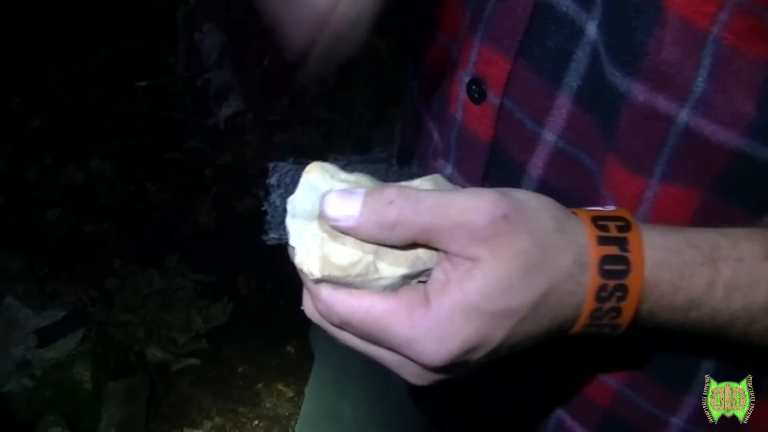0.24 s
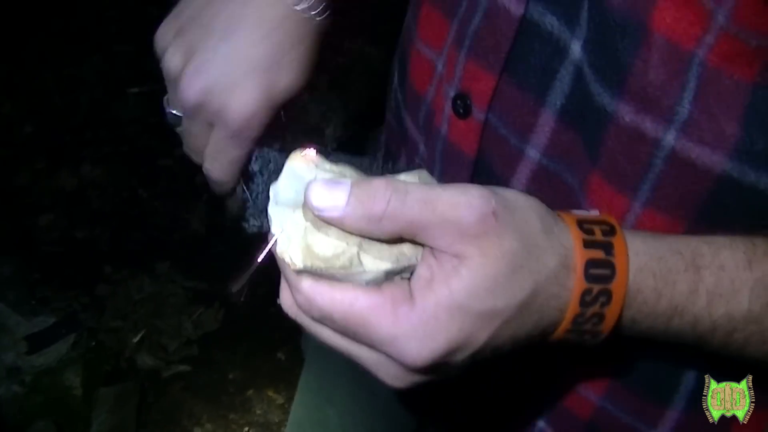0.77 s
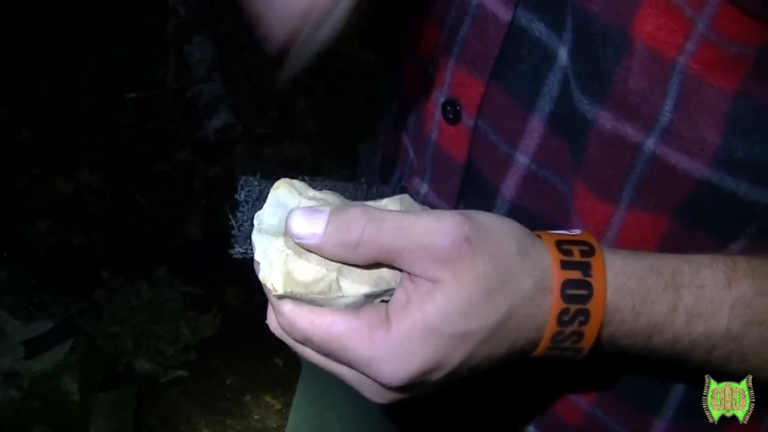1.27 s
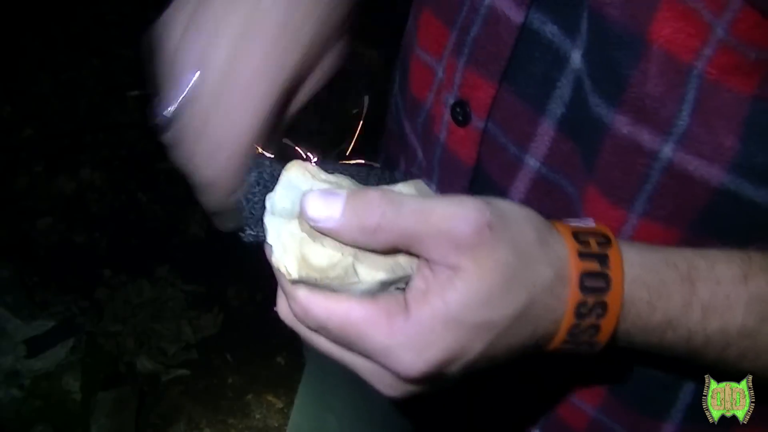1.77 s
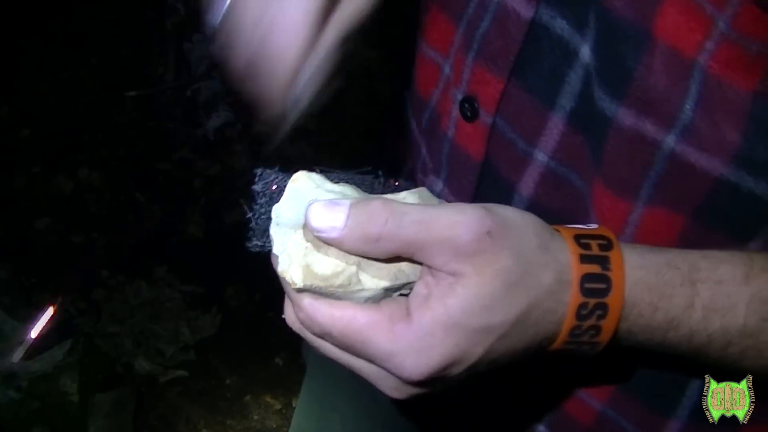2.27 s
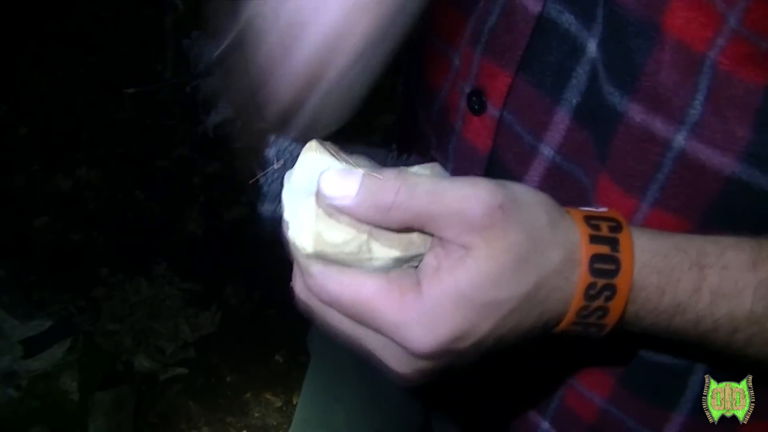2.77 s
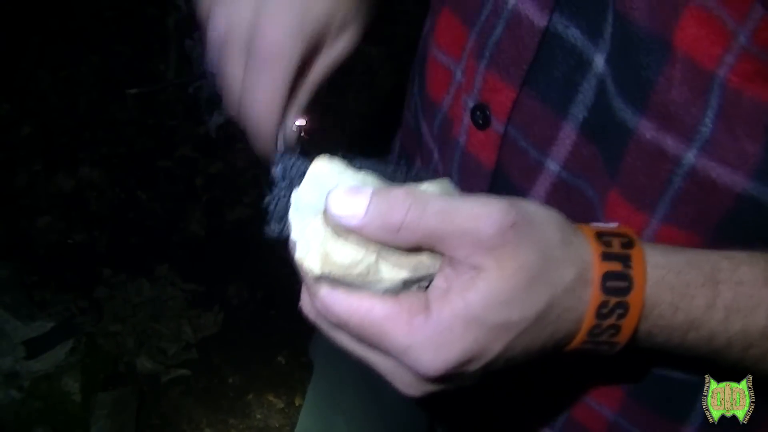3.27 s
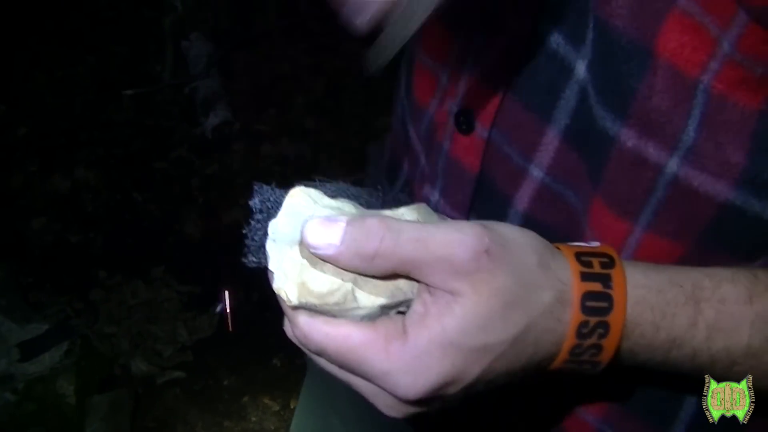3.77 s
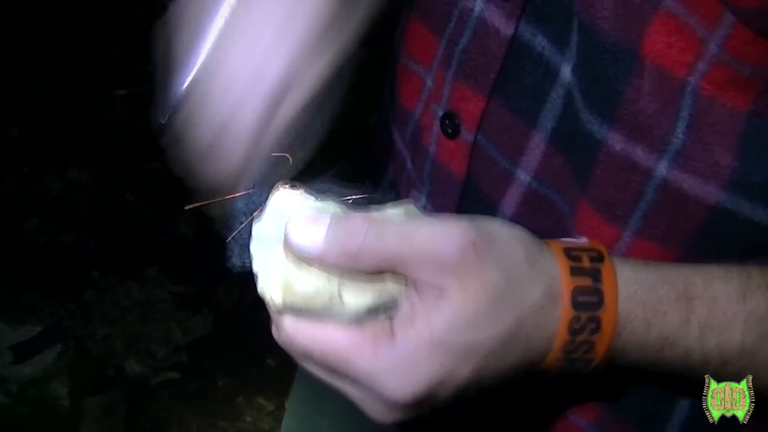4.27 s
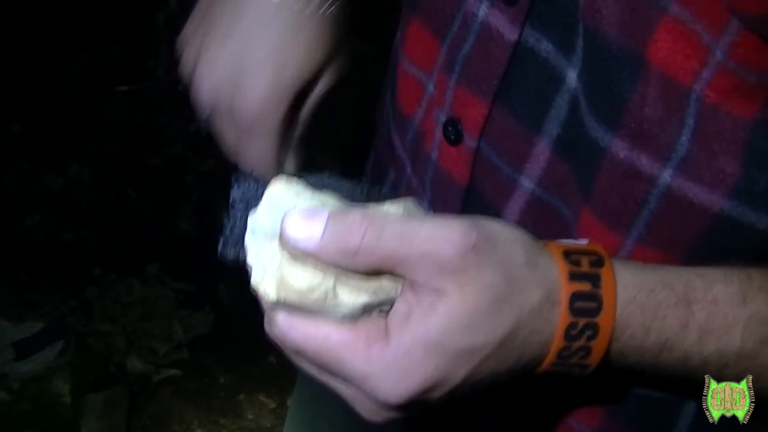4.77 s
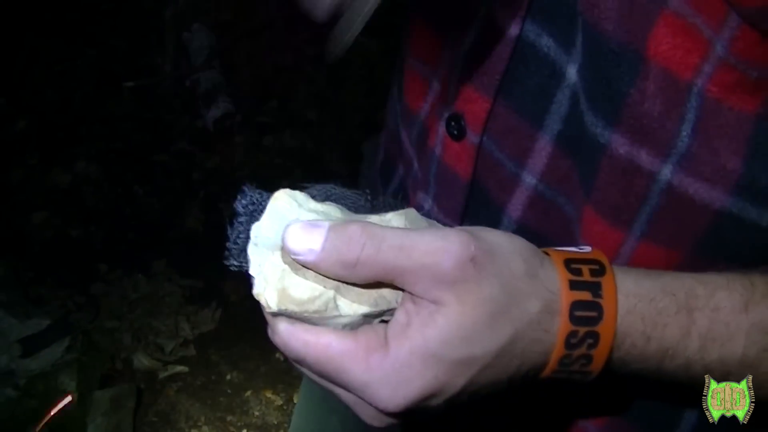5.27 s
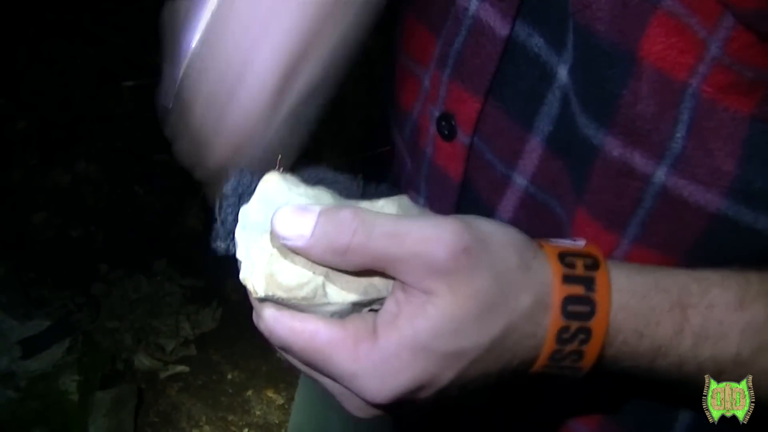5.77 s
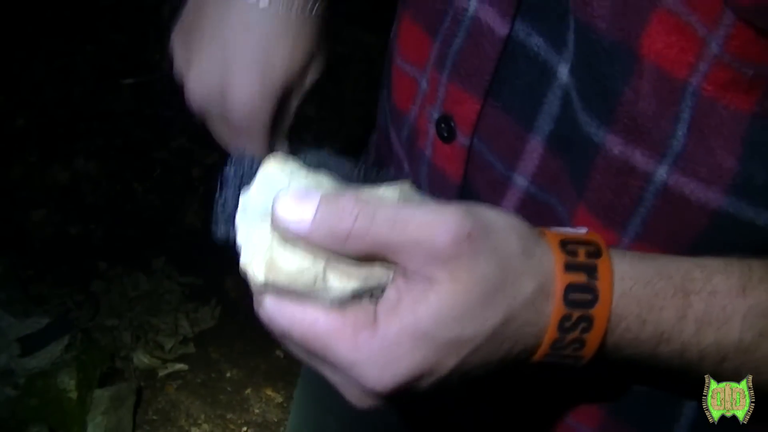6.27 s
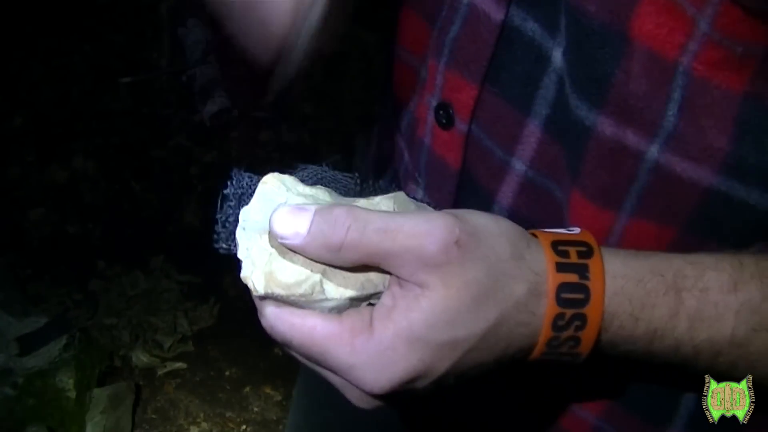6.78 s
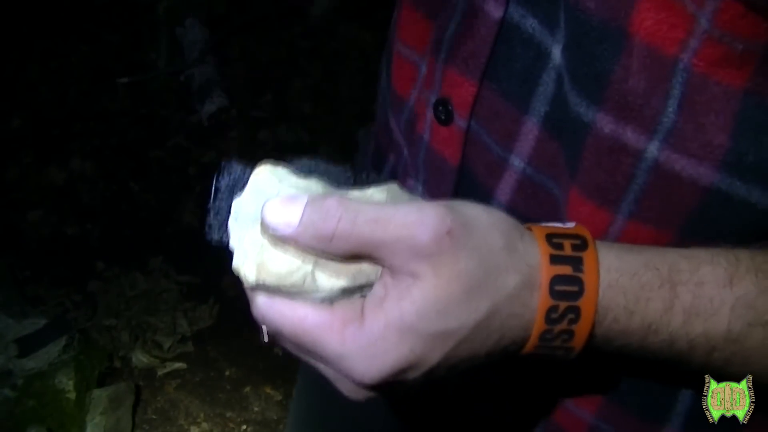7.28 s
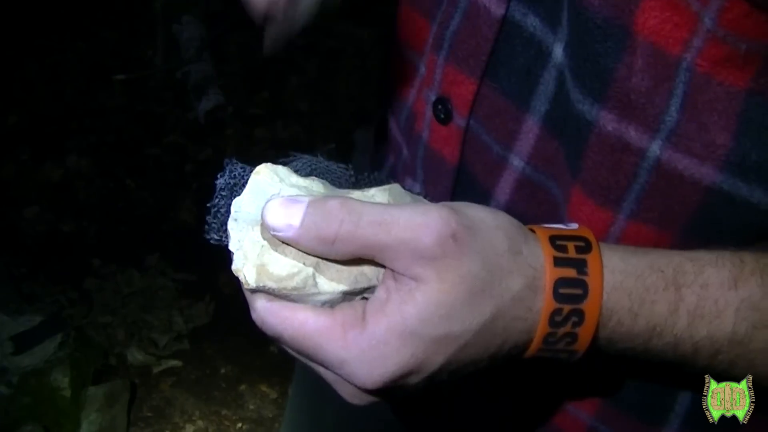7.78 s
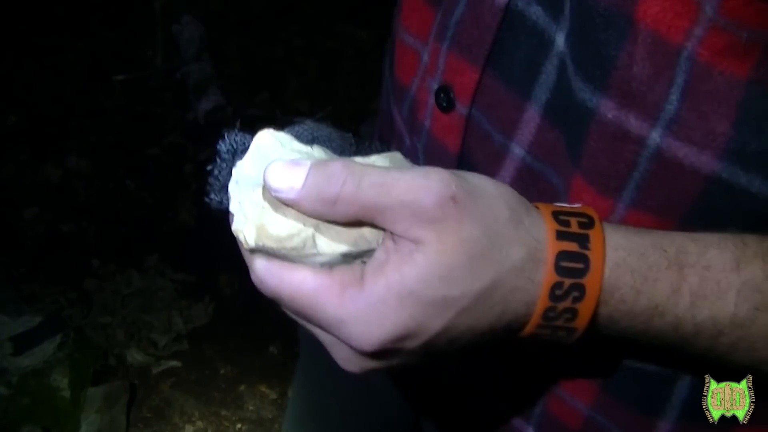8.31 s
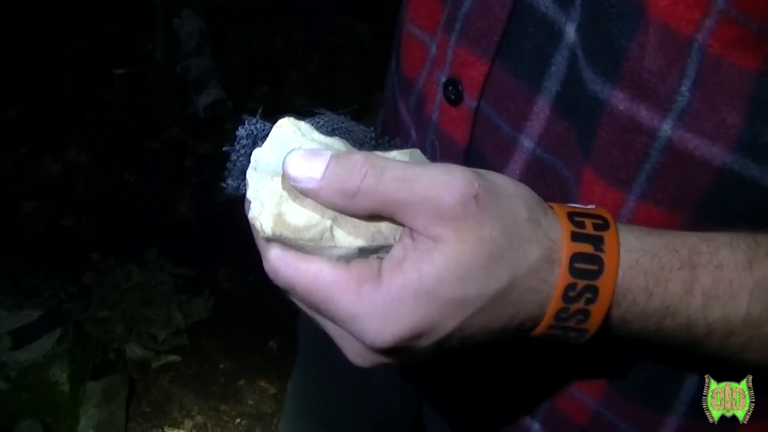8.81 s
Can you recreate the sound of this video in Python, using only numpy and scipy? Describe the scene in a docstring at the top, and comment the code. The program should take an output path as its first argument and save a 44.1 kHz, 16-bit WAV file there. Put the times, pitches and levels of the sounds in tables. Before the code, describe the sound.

Outdoors on a quiet night, bright clicks of steel on flint repeat at a brisk, mostly even pace, spacing out near the end. Stone and steel ring briefly with each strike, close enough to distort the microphone a little. Between the blows, dry leaves rustle and crackle in uneven swells as someone shifts about, and a twig cracks late on. Behind it all is a barely audible low hush of air.

```python
"""Sharp, ringing clicks of a steel striker hitting a hand-held flint again and again, outdoors at night.
In each blow the steel bites the edge, drags for a few milliseconds and catches once more, so stone and
steel ring briefly. Close by, dry leaves rustle and crunch and a twig snaps as someone shifts about.
A faint low hush lies under it all, and the small microphone overloads on the blows."""
import sys
import numpy as np
from scipy import signal
from scipy.fft import rfft, irfft, next_fast_len
from scipy.io import wavfile

SR = 44100
rng = np.random.default_rng(int(sys.argv[2]) if len(sys.argv) > 2 else 0)


def generate_wav(sig):
    """Save sig (samples, or channels by samples) to the path in sys.argv[1] as 16-bit PCM at SR."""
    pcm = np.round(np.clip(np.atleast_2d(sig).T, -1, 1) * 32767).astype(np.int16)
    wavfile.write(sys.argv[1], SR, pcm)


N = 399105

# The blows; the grip and the spot where stone meets steel change each time. Columns: start_s, drag_ms,
# catch_db, deep_flint_db, low_steel_db, middle_steel_db, top_steel_db
BLOW_LIST = [(0.0803, 7.4, -0.5, -1, -7, 0.5, 0.5), (0.4301, 1.84, -1.5, 2.5, -3.5, 0, -21),
             (0.7702, 3.6, 1.5, 3, -7, -12, -2), (1.1227, 0.98, 1.5, -7, -8, 3, -8),
             (1.4643, 1.1, -9, 0.1, -17, 1.5, -3), (1.8046, 2.7, -4, 3.5, -15, -5, -16),
             (2.1547, 1.04, 4, 1, -22, -5, 6), (2.8381, 5.1, 4, 4.5, -6, -5, 0.1),
             (3.2084, 1.0, -7, -0.5, -9, -12, -14), (3.5632, 4.96, 10, 2, -19, -4.5, -8),
             (3.9545, 0.87, -5, -1.5, -18, -3, -4), (4.3257, 2.8, 1, 1, -19, -17, 1),
             (4.7114, 1.1, -6, -8, -23, -19, -21), (5.0786, 2.9, -3, -2.5, -13, -3, -3.5),
             (5.4575, 4.2, 3, 2.5, -15, -7.5, -8), (5.8353, 1.2, -0.5, 1, -8, -6, -17),
             (6.2207, 1.2, -9, -1, -27, -2, -13), (6.6128, 3.5, 1.5, 1.5, -27, -5, -10),
             (6.996, 3.7, 3, 2.5, -10.5, -12, -5), (7.3864, 1.8, -10, 6, -10, -16, -18),
             (8.0436, 3.7, -3, -1, -12, -12, -20), (8.4644, 2.0, -5, -10, -21, 2, -20),
             (8.9547, 6.8, 0, 1.5, -21, -14, -19)]
# The tone of dry leaves, from bass to treble. Columns: pitch_hz, level_db
LEAF_TONE = [(30, -65), (100, -59), (255, -26), (433, -16.5), (547, -13.5), (760, -20), (1000, -8.5),
             (1300, -4.5), (1800, -3), (2420, -2), (3320, -2), (4500, -3), (5600, -5), (9500, -8.5),
             (12900, -17), (16000, -30.5)]


def amp(db):
    """Turn decibels into a number to multiply by."""
    return 10 ** (np.asarray(db) / 20)


def rms_one(x):
    """Scale a sound so that its average strength (rms) is 1."""
    return x / np.sqrt(np.mean(x ** 2) + 1e-20)


def at_hz(points):
    """Join (pitch_hz, value) points into a curve with a value for every frequency."""
    hz = np.maximum(np.fft.rfftfreq(next_fast_len(N), 1 / SR), 1)
    pitches_hz, values = np.transpose(points)
    return np.interp(np.log(hz), np.log(pitches_hz), values)


def colour(x, gain):
    """Change the tone of a sound: multiply each frequency by its own gain."""
    return irfft(rfft(x, next_fast_len(N)) * gain, next_fast_len(N))[:N]


def drift(rate_hz):
    """A smooth random wobble of typical size 1."""
    r = np.exp(-2 * np.pi * rate_hz / SR)
    return rms_one(signal.lfilter([1], [1, -2 * r, r * r], rng.standard_normal(N + SR))[SR:])


def ring(clicks, hz, fade_s):
    """Each click starts a pure tone that dies away; fade_s is the time it takes to drop 60 dB."""
    r = amp(-60 / (max(fade_s, .001) * SR))
    w = 2 * np.pi * hz / SR
    return signal.lfilter([0, np.sin(w)], [1, -2 * r * np.cos(w), r * r], clicks + 1e-18)


def grains(per_s, spread_db):
    """Tiny cracks of uneven size at random moments."""
    sizes = amp(spread_db * np.minimum(rng.exponential(1, N), 5)) * rng.choice([-1, 1], N)
    return rms_one(sizes * (rng.random(N) < per_s / SR))


def night(level_db=-66):
    """A faint, steady, low hush of distant outdoor air."""
    # The tone of the hush. Columns: pitch_hz, level_db
    hush_tone = [(25, -30), (60, -30), (180, -8.5), (500, -3), (900, -1), (2000, -40)]
    return amp(level_db) * rms_one(colour(rng.standard_normal(N), amp(at_hz(hush_tone))))


def rustle(flutter_db=1.29, flicker_db=0.8, usual_db=-32):
    """Dry leaves make many tiny cracks over a hiss; bass, middle and treble each flicker a little."""
    # How loudly the leaves rustle as someone shifts about. Columns: time_s, level_db
    loudness = [(0, -40), (.15, -37), (.36, -42), (.54, -40), (.63, -46.5), (.73, -39), (1.28, -39),
                (1.43, -26.5), (1.59, -25.5), (1.77, -33), (1.85, -26), (1.99, -28.5), (2.07, -24.5),
                (2.375, -32.5), (2.39, -24), (2.52, -30.5), (2.8, -30.5), (2.94, -34), (3.5, -34.5),
                (3.82, -44), (3.91, -33), (4.21, -29.5), (4.235, -20.5), (4.57, -20.5), (4.82, -32),
                (5.3, -31), (5.74, -35), (5.85, -35), (6.025, -43.5), (6.032, -30.5), (6.3, -38),
                (6.51, -27), (6.77, -37), (6.97, -41), (7.04, -35.5), (7.15, -46), (7.24, -45.5),
                (7.255, -33.5), (7.6, -31.5), (7.64, -37), (7.72, -30), (8.02, -26), (8.18, -37.5),
                (8.24, -29.5), (8.28, -24.5), (8.66, -24), (8.78, -26), (8.85, -23), (8.96, -25.5),
                (9.05, -18.5)]
    level_db = np.interp(np.arange(N) / SR, *np.transpose(loudness))
    treble_db = -2.5 + 0.026 * (level_db - usual_db)   # louder is slightly brighter
    bass_db = 5 - 0.18 * (level_db - usual_db)   # the bass swings less than the rest
    hiss_and_cracks = rng.standard_normal(N) + amp(-3) * grains(per_s=3000, spread_db=2.5)
    leaves = rms_one(colour(hiss_and_cracks, amp(at_hz(LEAF_TONE))))
    bass = colour(leaves, at_hz([(600, 1), (1000, 0)]))
    treble = colour(leaves, at_hz([(4500, 0), (9000, 1)]))
    middle = leaves - bass - treble
    mixed = middle * amp(flicker_db * drift(7))
    mixed += bass * amp(bass_db + flicker_db * drift(17))
    mixed += treble * amp(treble_db + flicker_db * drift(20))
    return mixed * amp(level_db + flutter_db * drift(29))


def crunches():
    """A crushed leaf gives a fading burst of cracks, loudest near its own pitch; returns mid and side."""
    # Leaves being crushed. Columns: start_s, level_db, fade_s, pitch_hz
    crushed_leaves = [(0.721, -35.5, .06, 2220), (0.8091, -35, .05, 3130), (0.8988, -25, 0.054, 2300),
                      (0.963, -27.5, 0.02, 4170), (0.978, -19, 0.0085, 5450), (0.9826, -21, 0.032, 5640),
                      (1.4122, -29, 0.059, 4850), (1.5928, -27, 0.21, 5070), (1.9116, -23.5, .046, 3480),
                      (2.0177, -26, .037, 3350), (2.046, -21, 0.015, 4730), (2.382, -30.5, 0.3, 3340),
                      (2.546, -34, 0.056, 4110), (3.1895, -29, .05, 3260), (3.32, -26.5, 0.12, 4670),
                      (4.6894, -25.5, 0.09, 3360), (5.056, -31, .066, 3030), (5.3235, -29.5, 0.15, 3500),
                      (5.559, -29, 0.046, 5030), (6.0292, -27, 0.033, 4700), (6.135, -32, 0.066, 3140),
                      (6.191, -32, 0.12, 3310), (6.419, -30.5, 0.056, 4200), (6.474, -32, 0.36, 3030),
                      (7.247, -34, 0.3, 2270), (7.306, -33, 0.11, 2260), (7.4734, -27, 0.027, 2190),
                      (7.5325, -31.5, 0.061, 4770), (7.5797, -29, .04, 4260), (7.8894, -29, 0.04, 4170),
                      (7.9483, -32, 0.035, 4080), (8.017, -22.5, 0.16, 3600), (8.57, -18, 0.033, 4720),
                      (8.6863, -22, 0.18, 4260), (8.8245, -24.5, 0.039, 4180), (8.8982, -27.5, 0.041, 4330),
                      (9.0008, -25, 0.1, 4540)]
    cracks = rng.standard_normal(N) + amp(4) * grains(per_s=4000, spread_db=2.5)
    mid, side = np.zeros(N), np.zeros(N)
    leans = 2 - rng.standard_normal(len(crushed_leaves))   # scattered, mostly a little to the left
    for (start_s, level_db, fade_s, pitch_hz), lean in zip(crushed_leaves, leans):
        at = round(start_s * SR)
        burst = cracks[at:at + SR // 5]
        near_pitch = signal.lfilter(*signal.iirpeak(pitch_hz, 2.5, fs=SR), burst)
        t = np.arange(len(burst)) / SR
        crunch = (1.58 * burst + 2 * near_pitch) * amp(level_db - 60 * t / fade_s)
        mid[at:at + len(t)] += crunch
        side[at:at + len(t)] += crunch * .5 * np.tanh(lean * np.log(10) / 40)
    tone = amp(at_hz(LEAF_TONE))
    return colour(mid, tone), colour(side, tone)


def snaps():
    """Each snap makes a twig ring briefly; a thin twig gives off no bass."""
    # The moments a twig snaps. Columns: start_s, level_db
    breaks = [(6.0294, -21.5), (6.7973, -8), (6.8082, -23)]
    # The tones the twig rings with. Columns: pitch_hz, level_db, fade_s
    twig_tones = [(600, -10, 0.021), (1830, 2.5, 0.0032), (2420, 5, 0.0034), (4500, -7.5, 0.013)]
    clicks = np.zeros(N)
    for start_s, level_db in breaks:
        clicks[round(start_s * SR)] = -amp(level_db)
    ringing = sum(amp(db) * ring(clicks, hz, fade_s) for hz, db, fade_s in twig_tones)
    return signal.sosfilt(signal.butter(2, 350, "high", fs=SR, output="sos"), ringing)


def close_echoes(x, moving_share=0.091, housing_share=0.091):
    """Two very quick echoes ripple the tone, and the microphone's housing adds a hollow ring."""
    # How late the echo off something close and moving arrives. Columns: time_s, delay_ms
    echo_delay = [(0, .43), (1.0, .43), (1.1, .86), (3.9, .85), (4.0, .61), (7.2, .65), (8.1, .46),
                  (8.45, .46), (8.5, .88), (9.05, .88)]
    # How strong the hollow ring is. Columns: time_s, relative_strength
    hollowness = [(0, 3.0), (1.0, 2.1), (1.6, 2.8), (2.3, 1.4), (3.9, 2.1), (6.1, 1.4), (7.2, 1.7),
                  (7.6, 3.5), (9.05, 2.8)]
    n = np.arange(N)
    hollow = signal.lfilter(*signal.iirpeak(4500, 4.5, fs=SR), x)
    hollow *= np.interp(n / SR, *np.transpose(hollowness))
    housing_echo = np.roll(x, 10)   # about 0.2 ms later
    delay_samples = np.interp(n / SR, *np.transpose(echo_delay)) * SR / 1000
    moving_echo = np.interp(n - delay_samples, n, x)
    return x + housing_share * (housing_echo + hollow) + moving_share * moving_echo


def scattered_echoes(x, level_db=-24, fade_s=0.21):
    """Hands, body and ground throw back a short blur of echoes."""
    t = np.arange(SR // 8) / SR
    blur = rng.standard_normal(len(t)) * amp(-60 * t / fade_s) * (t > .003)
    blur /= np.sqrt(np.sum(blur ** 2))
    return x + amp(level_db) * signal.fftconvolve(x, blur)[:N]


def jolts(level_db=-22, pitch_hz=260, fade_s=0.0081):
    """Each bite shoves the hand that holds the stone: a soft, low thump."""
    clicks = np.zeros(N)
    clicks[[round(start_s * SR) for start_s, *_ in BLOW_LIST]] = amp(level_db)
    return ring(clicks, pitch_hz, fade_s)


def contact(grit, drag_ms, catch_db, bite_db=4, grit_db=-22, grit_fade_s=.012):
    """The force of one blow: steel bites, scrapes off shavings and catches; grit crumbles at each hit."""
    t = np.arange(len(grit)) / SR
    catch_at = round(drag_ms * SR / 1000)
    scrape_db = min(-32 + 2 * drag_ms, -19.5)   # a longer drag scrapes harder, up to a limit
    force = amp(scrape_db) * grit * (t < t[catch_at])
    for at, hit_db in ((0, bite_db), (catch_at, catch_db)):
        force[at] -= amp(hit_db)
        force[at:] += grit[at:] * amp(hit_db + grit_db - 60 * t[:len(t) - at] / grit_fade_s)
    return force


def blows(spread_db=1.2, grip_detune=.012, deep_below_hz=2500):
    """Each blow makes flint and steel ring; the changing grip shifts the flint's tones a little."""
    # The tones of the flint in the hand. Columns: pitch_hz, level_db, fade_s
    flint_tones = [(973, -26, 0.035), (1324, -19, 0.013), (1800, -25, 0.035), (2085, -20.5, 0.0078),
                   (2356, -9, 0.0055), (2740, -27.5, 0.014), (3240, -6, 0.0083), (3530, -13.5, 0.012),
                   (4200, -11, 0.0034), (4480, -27, 0.0048), (5550, -7, 0.001), (7710, -27, 0.0079),
                   (8930, -26, 0.0038), (11240, -6.5, 0.0012), (14000, -31, 0.0013)]
    # The steel striker rings in pairs of close tones. Columns: pitch_hz, gap_hz
    steel_pairs = [(1670, 70), (6480, 130), (8070, 100), (12100, 220)]
    # How each of those pairs rings. Columns: level_db, fade_s
    steel_rings = [(-21, 0.061), (-21, 0.032), (-27, 0.056), (-13, 0.018)]
    out, length = np.zeros(N + SR), SR // 8
    grit = grains(per_s=5000, spread_db=2.5)
    chances = rng.standard_normal((len(BLOW_LIST), len(flint_tones), 2))
    for blow, chance in zip(BLOW_LIST, chances):
        start_s, drag_ms, catch_db, deep_db, low_db, middle_db, top_db = blow
        at = round(start_s * SR)
        force = contact(np.resize(grit[at:], length), drag_ms, catch_db)
        for (hz, db, fade_s), (louder, higher) in zip(flint_tones, chance):
            tone_db = db + spread_db * louder + deep_db * (hz < deep_below_hz)
            out[at:at + length] += amp(tone_db) * ring(force, hz * (1 + grip_detune * higher), fade_s)
        steel_db = low_db, middle_db, middle_db, top_db
        for (hz, gap_hz), (db, fade_s), struck_db in zip(steel_pairs, steel_rings, steel_db):
            pair = ring(force, hz - gap_hz / 2, fade_s) + .5 * ring(force, hz + gap_hz / 2, fade_s)
            out[at:at + length] += amp(db + struck_db) * pair
    bass_cut = signal.butter(4, 1450, "high", fs=SR, output="sos")   # the blows carry no deep bass
    treble_cut = signal.butter(2, 13000, fs=SR, output="sos")   # a hit takes time, which dulls the top
    return signal.sosfilt(np.vstack([bass_cut, treble_cut]), out[:N])


def scene():
    """Blows ahead, leaves around; mid is what left and right share, side is how they differ."""
    # How much of the sound moves to the microphone's left opening. Columns: pitch_hz, share
    left_lean = [(1500, 0), (2400, .01), (4400, .11), (7000, .03), (9000, -.02), (12000, -.04)]
    # The tone of an echo from one side, compared with mid. Columns: pitch_hz, level_db
    side_echo_tone = [(150, -41), (500, -16), (1200, -49), (2400, -22), (4400, -16), (7000, -11),
                      (12000, -36)]
    crunch_mid, crunch_side = crunches()
    hits = scattered_echoes(blows() + jolts() + snaps())
    leaves = close_echoes(rustle() + crunch_mid)
    mid = hits + leaves + night()
    echo = np.concatenate([np.zeros(400), mid[:-400]])   # about 9 ms later
    side = colour(mid, at_hz(left_lean)) + colour(echo, amp(at_hz(side_echo_tone))) + crunch_side
    return np.array([mid + side, mid - side])


def record(dry, threshold_db=-6, attack_s=.002, release_db_per_s=300, clip_at=.9, cutoff_hz=16700):
    """The volume dips after loud peaks, too late to stop them clipping; then the highest treble is cut."""
    peak_db = 20 * np.log10(np.abs(dry).max(axis=0) + 1e-9)
    wanted_dip_db = .45 * np.maximum(peak_db - threshold_db, 0)
    recovery_db = release_db_per_s * np.arange(N) / SR
    held_dip_db = np.maximum.accumulate(wanted_dip_db + recovery_db) - recovery_db
    r = np.exp(-1 / (attack_s * SR))
    dip_db = signal.lfilter([1 - r], [1, -r], held_dip_db)   # the dip takes a moment to set in
    clipped = np.clip(dry * amp(-dip_db), -clip_at, clip_at)
    return signal.sosfilt(signal.cheby2(16, 70, cutoff_hz, fs=SR, output="sos"), clipped)


dry = scene()
out = record(dry)
generate_wav(out)
```